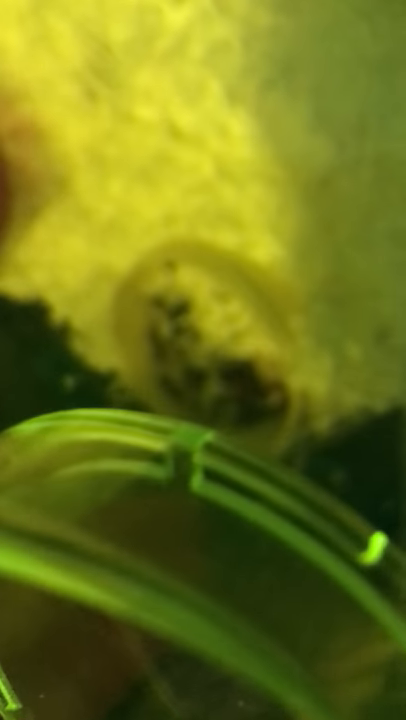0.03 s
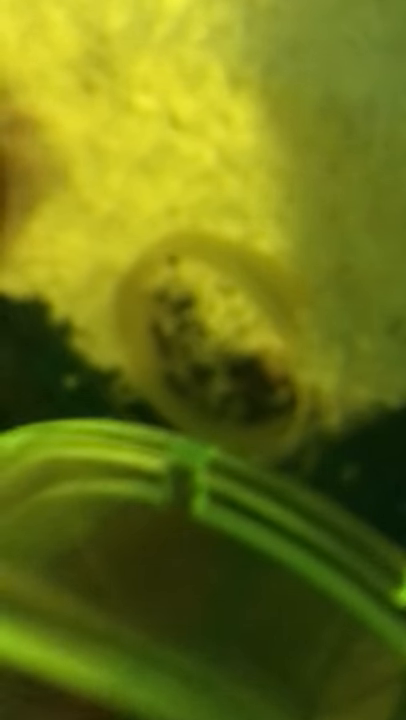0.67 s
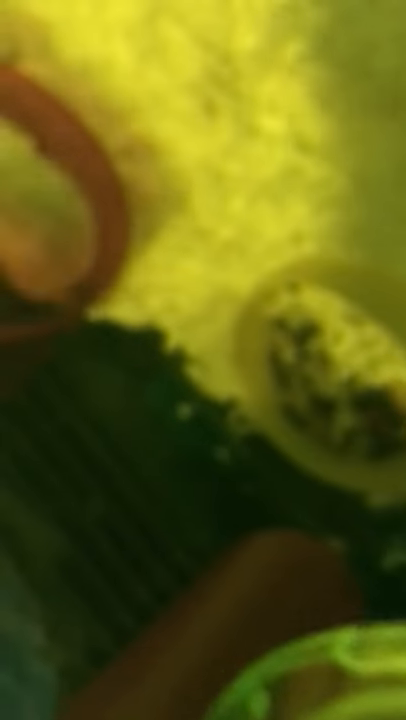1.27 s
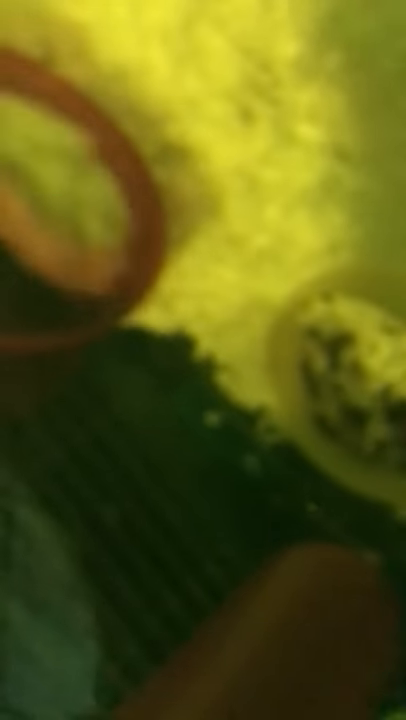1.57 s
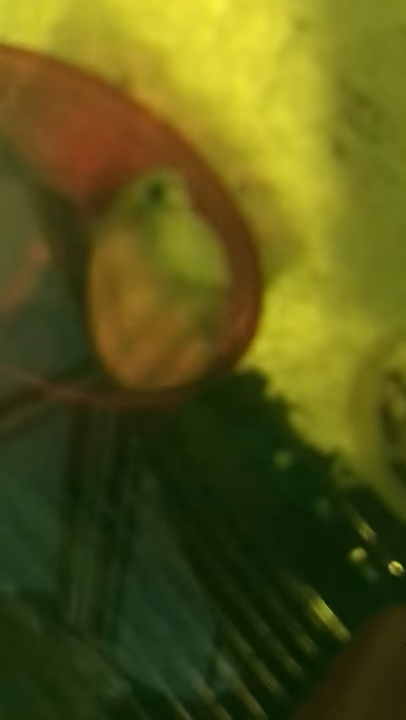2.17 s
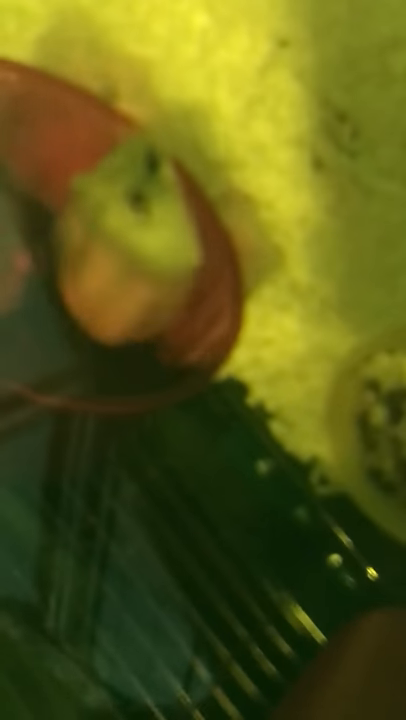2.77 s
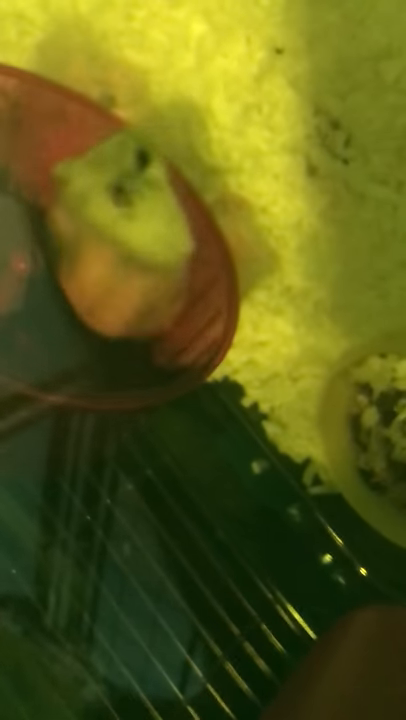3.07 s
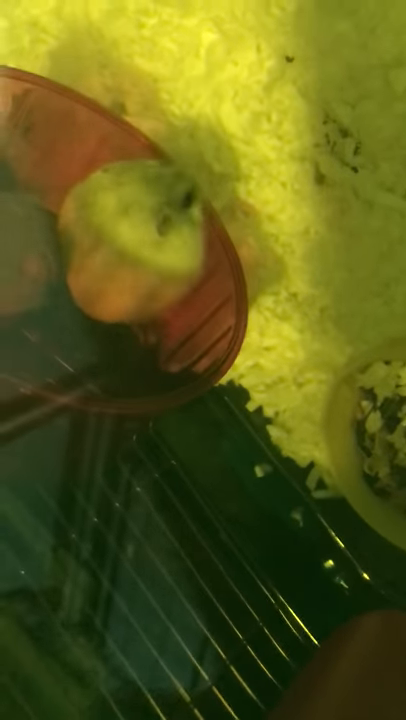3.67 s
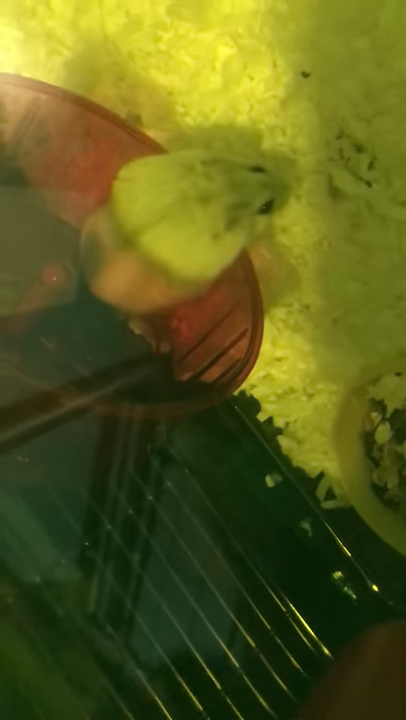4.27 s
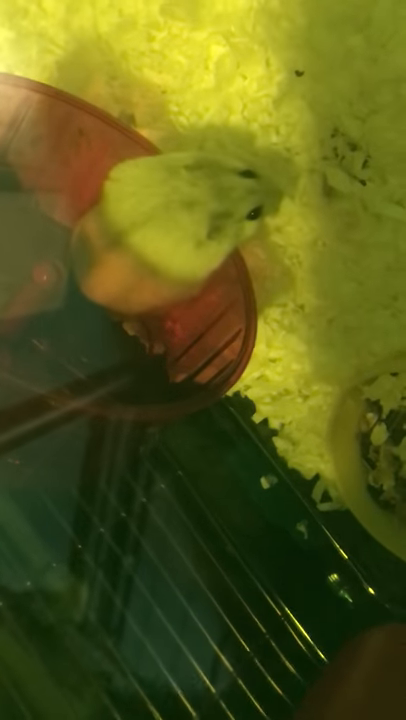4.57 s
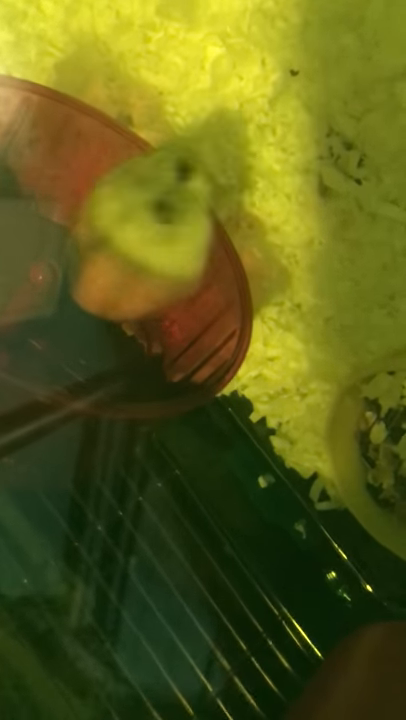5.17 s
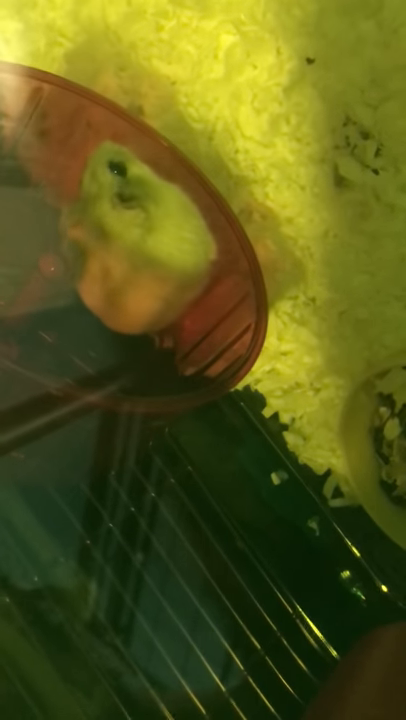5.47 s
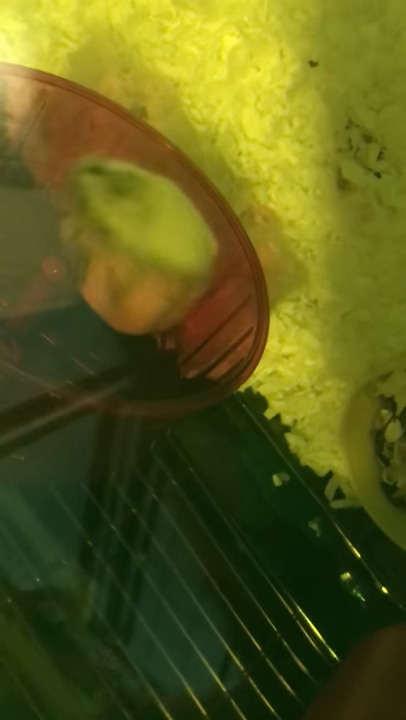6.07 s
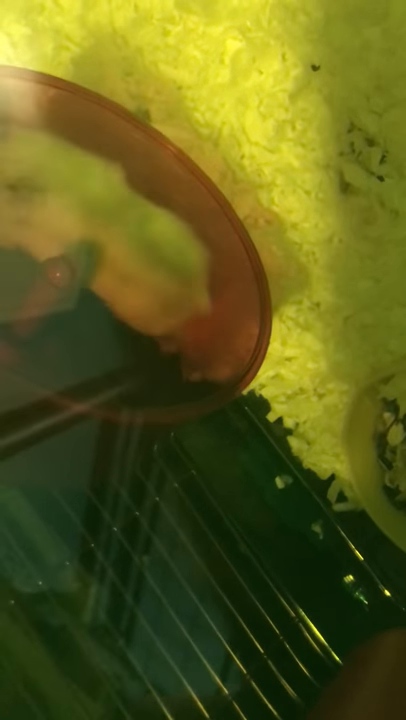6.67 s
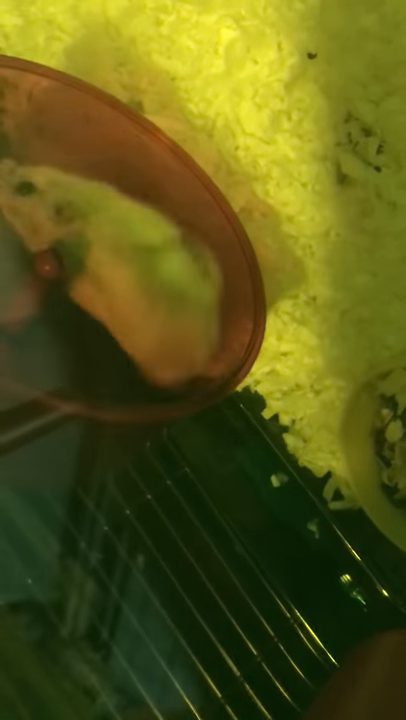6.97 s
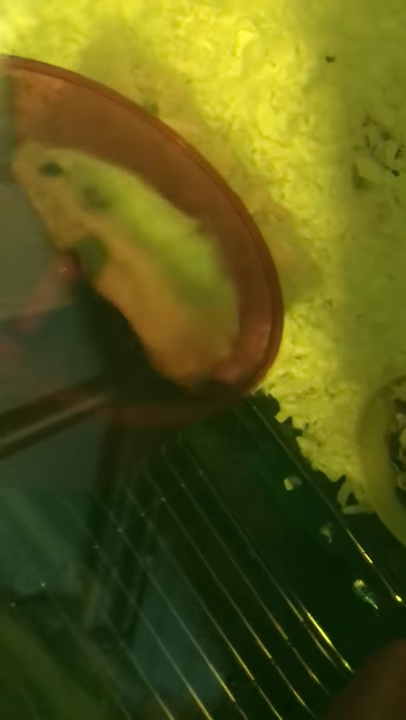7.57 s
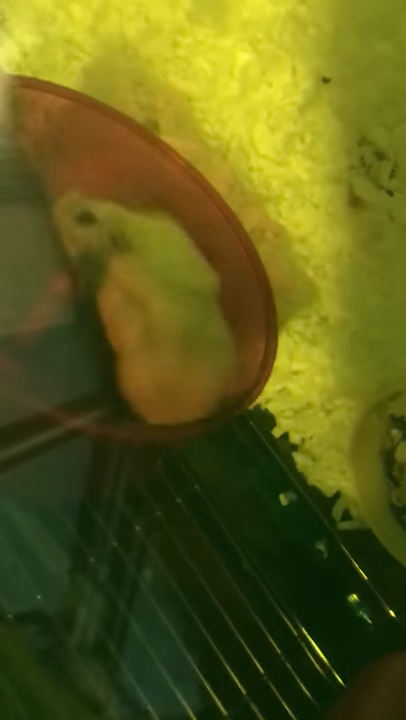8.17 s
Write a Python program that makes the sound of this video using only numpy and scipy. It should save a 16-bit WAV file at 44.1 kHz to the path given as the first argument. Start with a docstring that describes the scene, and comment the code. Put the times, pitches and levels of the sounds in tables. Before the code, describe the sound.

From the start, a hamster runs in a plastic wheel, heard close by in a quiet room. The wheel rumbles through its stand, the loose hub chatters and clacks irregularly, and quick claws scratch the ribbed track over a gritty rubbing of the rim. At about 1.8 seconds the wheel coasts to rest, while the shaken cage rings and rustles on faintly. From 2.4 to 6.2 seconds the animal shifts about with a few soft, dull thumps, faint paw slides and small plastic ticks, the clearest near 4.4 seconds. Firmer thumps around 6.5 seconds lead into a second run, heavier and duller, with fine claw ticks. Its rumbling and clacking surge at about 7.4 and 8 seconds and continue to the end, near 8.4 seconds. A low, steady room hiss lies underneath throughout.

```python
"""A plastic hamster wheel rumbles through its stand while its loose hub chatters and clacks on the axle.
Claws scratch the ribbed track and the rim rubs gritty as the animal runs in spurts. The wheel coasts
to rest, the hamster shifts about with soft thumps, ticks and paw slides, then it runs again.
The shaken cage rings and rustles on faintly over quiet room hiss."""
import sys
import numpy as np
from scipy import signal
from scipy.fft import rfft, irfft, next_fast_len
from scipy.io import wavfile
from scipy.ndimage import uniform_filter1d, map_coordinates

SR = 44100
rng = np.random.default_rng(int(sys.argv[2]) if len(sys.argv) > 2 else 0)


def output_pcm(signal):
    """Save a mono or channel-first signal as 16-bit PCM at the path in sys.argv[1].

    Samples are clipped to [-1, 1] before scaling.
    """
    pcm = np.clip(np.atleast_2d(signal).T, -1, 1) * 32767
    wavfile.write(sys.argv[1], SR, np.round(pcm).astype(np.int16))


N = 371763

# EQ of the room hiss: f/Hz, level/dB
ROOM_EQ = [(20, -4), (40, -8), (60, -2.5), (140, -5), (200, -11.5), (290, -17.5), (370, -20), (520, -16),
           (760, -20), (1200, -24), (1550, -27), (4100, -33.5), (4800, -36), (6000, -37), (10400, -42.5),
           (15600, -40.5)]
# EQ of the rustling axle and loose bars: f/Hz, level/dB
RUSTLE_EQ = [(400, -32), (600, -2), (900, -1), (1150, -3), (1380, -4), (1550, 1), (1900, -20), (2200, -36)]
# long ring of the cage bars: f/Hz, level/dB, t60/s
CAGE_MODES = [(446, -7, 5.7), (461, 4, 3.8), (482.6, 2.5, 6.2), (617, 0.5, 2.2), (624, -2, 2.3),
              (653, -5, 3.8), (679, -5.5, 2.6), (897, -13.5, 4.2), (1046, -14.5, 4.6), (1240, -5, 1.3),
              (1510, -17, 2), (1527, -9, 2), (1840, -10, 2)]
# paw slips on the resting wheel: t/s, length/s, level/dB, brightness/(dB per octave)
SLIDE_CUES = [(2.516, 0.06, -64, 4.5), (2.788, 0.17, -76, 6), (3.688, 0.034, -63, -9),
              (5.06, 0.24, -68, -2), (5.809, 0.28, -70.5, -1)]
# EQ of a sliding paw: f/Hz, level/dB
SLIDE_EQ = [(500, -7), (1000, 12), (2000, 10), (4000, 0), (7000, -5), (15000, -23)]
# ticks of the resting plastic: t/s, level/dB, relative edge/dB
TICK_CUES = [(3.695, -56, -8), (3.717, -49, -20), (4.374, -36.5, -11), (4.49, -47.5, -26),
             (4.501, -48.5, -26), (4.973, -49, -18), (5.411, -49, -8)]
# body of a tick: f/Hz, width/Hz, level/dB
TICK_MODES = [(520, 51, 0), (950, 180, -17), (1340, 240, 4), (1960, 170, -1), (3280, 150, -3),
              (4020, 260, -1), (9060, 500, -11)]
# weight shifts in the wheel: t/s, level/dB, cut-off/Hz
THUMP_CUES = [(2.44, -41.5, 250), (2.676, -39.5, 280), (4.594, -47, 170), (5.329, -40.5, 168),
              (6.256, -44.5, 220), (6.443, -32, 510), (6.576, -33.5, 448), (6.689, -34, 595)]
# footfalls: t/s, level/dB, relative claw tip/dB
FOOTFALL_CUES = [(0.026, -31.5, -9), (0.087, -38, -7), (0.145, -43, -4), (0.177, -25.5, -9.5),
                 (0.25, -40, -4), (0.273, -25, -16), (0.295, -30, -12), (0.332, -30, -16),
                 (0.353, -26.5, -11.5), (0.395, -23, -11.5), (0.429, -24.5, -16), (0.455, -35, -5.5),
                 (0.514, -40.5, -3), (0.562, -31, -8), (0.602, -29.5, -9), (0.664, -30, -13),
                 (0.776, -31, -10), (0.826, -28, -13), (0.891, -36.5, -5.5), (0.935, -24.5, -10),
                 (1.004, -40.5, -3), (1.048, -47, -3), (1.066, -48, -6), (1.101, -33.5, -15),
                 (1.12, -31, -12.5), (1.217, -36.5, -18), (1.277, -34, -18), (1.341, -37, -11),
                 (1.388, -28, -11), (1.453, -33.5, -10.5), (1.468, -37, -8), (1.494, -31.5, -17),
                 (1.544, -24.5, -17), (1.574, -32, -21), (1.594, -32, -18), (1.656, -31, -18),
                 (1.68, -37, -24), (1.705, -34, -21), (1.763, -34.5, -16), (1.829, -58, -4),
                 (1.856, -42.5, -20), (1.895, -38, -20), (2.005, -58, -6), (6.58, -50.5, -12.5),
                 (6.635, -50, -26), (6.728, -38.5, -20), (6.865, -46.5, -26), (6.926, -42.5, -21),
                 (6.984, -37, -19), (7.116, -39.5, -22), (7.179, -40.5, -24), (7.241, -35, -16),
                 (7.257, -46, -4), (7.283, -32, -19), (7.311, -34, -15.5), (7.359, -33.5, -11.5),
                 (7.418, -44, -5), (7.481, -55, -8), (7.538, -36, -16), (7.594, -44, -8), (7.652, -36, -14),
                 (7.672, -37, -23), (7.749, -40.5, -19), (7.795, -36, -19), (7.912, -35, -15),
                 (7.961, -35, -32), (7.989, -35.5, -9), (8.024, -31.5, -16), (8.044, -34.5, -10.5),
                 (8.082, -33, -12), (8.194, -40, -19), (8.256, -41.5, -22), (8.317, -43.5, -22),
                 (8.373, -32, -15.5)]
# the ribbed track: f/Hz, width/Hz, level/dB
TRACK_MODES = [(2395, 137, 10), (3080, 420, 5), (3630, 210, 7), (4270, 590, 1.5), (4710, 170, 1.5),
               (5326, 180, 3.5), (5965, 170, -1), (6454, 193, 0.5), (7400, 270, -6.5), (7950, 450, -5.5),
               (9100, 1070, -6.5), (10760, 370, -13), (12080, 830, -12), (13500, 600, -13.5),
               (15100, 800, -16)]
# the single rib under a claw: f/Hz, width/Hz, level/dB
RIB_MODES = [(3690, 45, 0), (5480, 130, -4)]
# rib ring against the footfall, freer in the second run: t/s, level/dB
RIB_SEND = [(1.8, -11), (6.5, -2.5)]
# claw tips sound finer in the second run: t/s, treble tilt/dB
CLAW_TILT = [(.5, 1), (7, 4.5)]
# the thin plastic drum: f/Hz, width/Hz, level/dB
DRUM_MODES = [(771, 60, -17.0), (850, 18, -6.5), (900, 50, -9.0), (968, 35, -4.0), (1008, 24, -1.0),
              (1060, 45, -7.0), (1131, 32, -1.5), (1183, 21, -3.0), (1249, 36, -0.5), (1339, 24, 0.0),
              (1403, 71, -7.0), (1558, 183, -11.0), (1711, 46, -5.5), (1806, 32, -3), (2004, 190, -13.0),
              (2275, 60, -11), (2529, 46, -16.0), (2613, 15, -6.0), (3033, 260, -21.0), (3441, 206, -21.0),
              (3783, 229, -22.0), (4021, 214, -23.0)]
# the crack at the front of a hub knock: f/Hz, width/Hz, level/dB
CRACK_MODES = [(1152, 67, 26.5), (1987, 214, 13.5), (2170, 330, -12)]
# hard knocks of hub on axle: t/s, level/dB, relative edge/dB
CLACK_CUES = [(0.109, -21, -37), (0.154, -16, -24), (0.219, -22.5, -20), (0.266, -21.5, -15.5),
              (0.327, -20, -17), (0.419, -14, -19), (0.441, -28, -10), (0.481, -17.5, -17),
              (0.537, -24.5, -10), (0.576, -14, -22), (0.6, -31, -31), (0.629, -12.5, -16.5),
              (0.637, -23.5, -8), (0.758, -23.5, -14), (0.815, -20.5, -25), (0.875, -25, -12.5),
              (1.015, -16, -25), (1.262, -24.5, -19.5), (1.316, -33.5, -6), (1.345, -19, -17),
              (1.426, -16.5, -36), (1.461, -11.5, -16), (1.47, -27, -22), (1.584, -20.5, -28),
              (1.648, -27, -28), (1.761, -22.5, -29), (1.888, -28, -38), (6.555, -30, -23.5),
              (6.564, -34, -24), (6.685, -30.5, -22), (6.834, -33.5, -24), (7.097, -47, -32),
              (7.277, -27.5, -10), (7.372, -20.5, -21), (7.422, -13.5, -19), (7.606, -15.5, -24.5),
              (7.661, -16, -17.5), (7.898, -26.5, -24), (7.929, -27, -22), (8.006, -21, -18.5),
              (8.054, -18.5, -20), (8.077, -16, -23), (8.167, -19.5, -23), (8.287, -24.5, -21),
              (8.36, -23.5, -29)]
# the animal's place in the drum colours the hub: t/s, treble tilt/dB
HUB_TILT = [(2, 0.14), (6.5, -2)]
# wheel and stand, weighted by the animal's place: f/Hz, width/Hz, run 1 level/dB, run 2 level/dB
STAND_MODES = [(55, 27, -14, -13), (72, 11, -5, -4), (87, 11, -9, -7), (112, 7, -10, -9), (129, 20, -7, -6),
               (146, 19, -6, -5), (172, 8, 0, 2), (193, 24, -6, -6), (228, 18, -6, -9), (262, 14, -7, -7),
               (284, 25, -10, -9), (329, 11, -6, -3), (351, 16, -13, -14), (383, 8, -2, -10),
               (448, 11, -6, -6), (482, 19, -14, -15), (571, 50, -18, -19), (613, 9, -9, -15),
               (652, 25, -19, -19)]
# drive on the wheel in each run, surging with every spurt: t/s, effort/dB
FIRST_RUN = [(0.0, -28), (0.098, -30), (0.168, -27), (0.198, -28.5), (0.652, -25.5), (0.712, -32),
             (0.872, -33.5), (0.916, -25.5), (1.012, -26.5), (1.196, -33), (1.484, -24.5), (1.51, -27),
             (1.654, -26.5), (1.789, -28)]
SECOND_RUN = [(6.565, -41), (6.6, -37.5), (6.63, -40.5), (6.672, -40.5), (6.702, -33), (6.77, -35),
              (6.815, -40.5), (6.85, -34.5), (6.97, -31.5), (7.06, -35), (7.342, -23), (7.506, -27),
              (7.662, -25), (7.882, -34), (8.022, -25), (8.356, -33.5), (8.398, -29.5), (8.43, -31)]
# faders at full effort, a row per run, the second heavier and duller: rumble/dB, chatter/dB, grit/dB
RUN_FADERS = [(-29.5, -32, -47), (-27, -36.5, -57)]

FULL_EFFORT_DB, START_DB_PER_S, COAST_DB_PER_S = -27, 599, 37.5
CHATTER_GROWS, GRIT_GROWS = 1.64, 1.5  # dB per dB of effort
UNLOAD_S, UNLOAD_DB = 0.029, 8.5  # chatter and grit duck once the paws let go
COAST_HINGE_HZ, COAST_DULL_DB = 240, 3.5  # high-shelf cut on the coasting rumble
KNOCKS_PER_S, KNOCK_DB, KNOCK_EDGE_DB, FAINTEST_DB = 6.3, 3, -17.5, -45  # light, chance hub knocks
CRACK_DB, CRACK_SCATTER_OCT = 1.5, 0.079  # the pitch differs with the spot that is hit
SPOT_DB = 1.8  # each claw lands elsewhere and weights the track's modes anew
GRIT_PER_S, CLUMP_DB, CLUMPS_PER_S = 2300, 4, 60
HARD_TICK_DB, THUMP_T60_S = -39.5, 0.37
CAGE_WAVER, CAGE_BEAT_DB, CAGE_BEATS_PER_S = 0.008, 3, 14  # waver is a share of the pitch
TOP_HZ = 15780


def amp(db):
    """Decibels to gain."""
    return 10 ** (np.asarray(db) / 20)


def unit(x):
    """Scale to rms 1."""
    return x / np.sqrt(np.mean(x ** 2) + 1e-20)


def normed(x):
    """Scale to energy 1."""
    return x / np.linalg.norm(x)


def peaked(x, db):
    """Scale a sound so that its envelope crests at db."""
    return x * amp(db) / np.sqrt(uniform_filter1d(x ** 2, size=128).max())


def levelled(x, size):
    """Even out the slow swings of a rattle over a window of size samples."""
    return x / np.sqrt(np.abs(uniform_filter1d(x ** 2, size=size)) + 1e-12)


def add(track, s, sound):
    """Mix a sound in at time s."""
    start = max(round(s * SR), 0)
    track[start:start + len(sound)] += sound[:max(N - start, 0)]


def filtered(x, response):
    """x through a frequency response."""
    size = next_fast_len(len(x) + 8192)
    return irfft(rfft(x, size) * response(np.fft.rfftfreq(size, 1 / SR)), size)[:len(x)]


def eq(x, points):
    """x through an EQ curve on a log axis: f/Hz, level/dB."""
    f, db = np.transpose(points)
    return filtered(x, lambda hz: amp(np.interp(np.log(hz + 1), np.log(f), db, left=-120)))


def resonate(x, modes):
    """x through a body's resonances, alternating in polarity: f/Hz, width/Hz, level/dB."""
    return filtered(x, lambda f: sum(
        (-1) ** k * amp(db) * 1j * f * width / (hz * hz - f * f + 1j * f * width)
        for k, (hz, width, db) in enumerate(modes)))


def band(x, edge_hz, kind, order=2):
    """Causal high-pass or low-pass."""
    return signal.sosfilt(signal.butter(order, edge_hz, kind, fs=SR, output="sos"), x)


def lows(x, hinge_hz):
    """The low side of a zero-phase crossover."""
    return filtered(x, lambda hz: 1 / (1 + (hz / hinge_hz) ** 8))


def tilted(x, hinge_hz, curve):
    """Automated tilt EQ: the curve's dB are added above the hinge and taken away below."""
    low = lows(x, hinge_hz)
    tilt_db = np.interp(np.arange(N) / SR, *np.transpose(curve))
    return amp(-tilt_db) * low + amp(tilt_db) * (x - low)


def enclosed(x, t60, wet_db):
    """x with the short, dense reflections of drum and cage."""
    t = np.arange(SR // 4) / SR
    tail = rng.standard_normal(len(t)) * amp(-60 * t / t60)
    return x + amp(wet_db) * signal.fftconvolve(x, normed(tail))[:len(x)]


def wobble(rate):
    """A smooth random curve, rate knots a second."""
    return map_coordinates(rng.standard_normal(int(N * rate / SR) + 4), [np.arange(N) * rate / SR])


def impacts(per_second, spread_db, size=N):
    """Randomly timed contacts of scattered strength."""
    hits = (rng.random(size) < per_second / SR) * rng.choice([-1, 1], size)
    return hits * amp(spread_db * rng.standard_normal(size).clip(-2, 2))


def contact(bounces_per_s, bounce_share, t60):
    """One blow of energy 1: a first touch, then a dying run of bounces."""
    t = np.arange(SR // 10) / SR
    bounces = impacts(bounces_per_s, spread_db=6.5, size=len(t)) * amp(-60 * t / t60)
    blow = bounce_share * normed(bounces)
    blow[0] = 1
    return normed(blow)


def struck(blows, ring):
    """An ongoing train of blows through a body's ringing."""
    return signal.oaconvolve(np.pad(blows, (len(ring), 0), "wrap"), normed(ring))[len(ring):][:N]


def lingering(gain, t60):
    """Envelope of something that stores the wheel's energy and lets it die away over t60."""
    keep = amp(-120 / (t60 * SR))
    return np.sqrt(signal.lfilter([1 - keep], [1, -keep], gain ** 2))


def room():
    """The bed: steady hiss, a weak mains hum and a thin electronic whine."""
    t = np.arange(N) / SR
    hiss = unit(eq(rng.standard_normal(N), ROOM_EQ))
    hum = np.sin(2 * np.pi * 59.5 * t)
    whine = sum(np.sin(2 * np.pi * 1002.2 * k * t) * min(1, 4 / k) for k in range(2, 15))
    return amp(-58) * hiss + amp(-60.5) * hum + amp(-83.5) * whine


def rustle(gain):
    """A soft rustle of the axle and loose bars hangs on after the wheel slows."""
    noise = band(eq(rng.standard_normal(N), RUSTLE_EQ), 2350, "low", order=4)
    return amp(-30.5) * lingering(gain, t60=5.5) * unit(noise)


def cage(gain):
    """Lightly damped bars store the wheel's shaking and ring on as wavering, beating tones."""
    out = np.zeros(N)
    for hz, db, t60 in CAGE_MODES:
        pitch = hz * (1 + CAGE_WAVER * wobble(20))
        tone = np.sin(2 * np.pi * np.cumsum(pitch) / SR)
        beating = unit(amp(CAGE_BEAT_DB * wobble(CAGE_BEATS_PER_S)))
        out += amp(db - 23) * lingering(gain, t60) * beating * tone
    return out


def slides():
    """A paw slips on the track: a short swell of tiny catches."""
    out = np.zeros(N)
    for s, length_s, db, bright in SLIDE_CUES:
        size = int(length_s * SR)
        colour = [(hz, level + bright * np.log2(hz)) for hz, level in SLIDE_EQ]
        grit = eq(impacts(4000, spread_db=2, size=size), colour)
        add(out, s, amp(db) * unit(grit) * signal.windows.tukey(size, 0.5))
    return out


def ticks():
    """The plastic ticks as the load on the resting wheel changes; harder ticks knock and snap more."""
    out = np.zeros(N)
    groups = TICK_MODES[:1], TICK_MODES[1:4], TICK_MODES[4:6], TICK_MODES[6:]
    for s, db, edge_db in TICK_CUES:
        tap = enclosed(signal.unit_impulse(SR // 8), t60=0.094, wet_db=-11)
        knock, middle, edge, snap = (unit(resonate(tap, modes)) for modes in groups)
        force_db = db - HARD_TICK_DB
        body = amp(force_db + 4.5) * knock + amp(-1.5) * middle
        top = amp(edge_db + 10.5) * edge + amp(2 * force_db - 6) * snap
        add(out, s, peaked(body + top, db - 5.5))
    return out


def stand_modes(run):
    """The stand's modes as the first (0) or second (1) run drives them."""
    return [(hz, width, levels[run]) for hz, width, *levels in STAND_MODES]


def thumps():
    """The furry body's weight drops on the stand with no sharp edge; softer landings are duller."""
    out, t = np.zeros(N), np.arange(SR // 3) / SR
    tap = signal.unit_impulse(len(t))
    ring = band(sum(resonate(tap, [mode]) for mode in stand_modes(1)), 95, "high", order=3)
    for s, db, cutoff_hz in THUMP_CUES:
        push = rng.standard_normal(len(t)) * amp(-60 * t / THUMP_T60_S)
        muffled = band(ring, cutoff_hz, "low", order=5)
        add(out, s, peaked(signal.fftconvolve(push, muffled)[:len(t)], db - 5))
    return out


def rim_scrape(gain):
    """The rim rubs its stand in gritty clumps that keep the track sounding between footfalls."""
    catches = impacts(GRIT_PER_S, spread_db=4) * amp(CLUMP_DB * wobble(CLUMPS_PER_S))
    grit = enclosed(resonate(catches, TRACK_MODES), t60=0.053, wet_db=7.5)
    return gain * unit(band(band(grit, 1900, "high"), 9900, "low", order=1))


def claws():
    """Each claw ticks and skids on the track and rings a rib; its sharp tip adds the top end."""
    body, tips = np.zeros((2, N))
    for s, db, tip_db in FOOTFALL_CUES:
        skid = contact(bounces_per_s=4500, bounce_share=2.8, t60=0.055)
        modes = [(hz, width, level + SPOT_DB * rng.standard_normal()) for hz, width, level in TRACK_MODES]
        track = resonate(skid, modes)
        scratch = normed(band(band(track, 2460, "high"), 6700, "low", order=4))
        rib = amp(np.interp(s, *np.transpose(RIB_SEND))) * normed(resonate(skid, RIB_MODES))
        add(body, s, amp(db + 13) * (scratch + rib))
        add(tips, s, amp(db + tip_db + 22) * normed(band(track, 5220, "high", order=4)))
    tips = tilted(tips, hinge_hz=10400, curve=CLAW_TILT)
    return enclosed(body, t60=0.13, wet_db=2) + enclosed(tips, t60=0.17, wet_db=4)


def chatter(gain):
    """The loose hub rattles lightly on the axle and shakes the drum."""
    ring = resonate(signal.unit_impulse(SR // 6, idx=256), DRUM_MODES)
    ring = eq(ring, [(450, -47), (750, 4.5), (1250, -0.5), (1900, 0.5),
                     (2600, -4), (3100, -27), (4200, 4), (7000, 19)])
    ring = band(ring, 4000, "low", order=5)
    rattle = unit(struck(impacts(1400, spread_db=1), ring))
    return amp(0.5) * gain * levelled(rattle, size=2400)


def clacks(gain):
    """The hub knocks and bounces, ringing the drum: hard hits on cue, lighter ones by chance."""
    tap = signal.unit_impulse(SR // 6)
    drum = normed(sum(resonate(tap, [mode]) for mode in DRUM_MODES))
    times = np.cumsum(rng.exponential(1 / KNOCKS_PER_S, size=200))
    light = []
    for s in times[times < N / SR]:
        db = KNOCK_DB + 20 * np.log10(gain[int(s * SR)] + 1e-9)
        if db > FAINTEST_DB:  # weaker knocks are lost in the chatter
            light.append((s, db, KNOCK_EDGE_DB))
    out = np.zeros(N)
    for s, db, edge_db in CLACK_CUES + light:
        pitch = 2 ** (CRACK_SCATTER_OCT * rng.standard_normal())
        crack = normed(resonate(tap, [(hz * pitch, width, level) for hz, width, level in CRACK_MODES]))
        ring = enclosed(drum + amp(CRACK_DB) * crack, t60=0.13, wet_db=2.5)
        body = band(band(ring, 610, "high"), 1855, "low", order=4)
        edge = band(band(ring, 2000, "high", order=4), 2800, "low", order=4)
        blow = contact(bounces_per_s=2000, bounce_share=1, t60=0.06)
        add(out, s, peaked(signal.fftconvolve(blow, body), db - 7.5))
        add(out, s, peaked(signal.fftconvolve(blow, edge), db + edge_db + 8))
    return out


def hub(gain):
    """Chatter and clacks of the hub, coloured by where the animal loads the drum."""
    return tilted(chatter(gain) + clacks(gain), hinge_hz=1160, curve=HUB_TILT)


def effort(curve):
    """One run from quick start to coast-down: dB against full effort, and the paws' release (0-1)."""
    t = np.arange(N) / SR
    s, db = np.transpose(curve)
    before, after = np.maximum(s[0] - t, 0), np.maximum(t - s[-1], 0)
    push_db = np.interp(t, s, db) - FULL_EFFORT_DB - START_DB_PER_S * before - COAST_DB_PER_S * after
    return push_db, np.minimum(after / UNLOAD_S, 1)


def wheel_gains():
    """Fader rides for rumble, chatter and grit: all follow the effort, the last two more steeply."""
    gains = np.zeros((3, N))
    for curve, (rumble_db, chatter_db, grit_db) in zip((FIRST_RUN, SECOND_RUN), RUN_FADERS):
        push_db, release = effort(curve)
        gains += amp([rumble_db + push_db,
                      chatter_db + CHATTER_GROWS * push_db - UNLOAD_DB * release,
                      grit_db + GRIT_GROWS * push_db - UNLOAD_DB * release])
    return gains


def wheel_rumble(gain):
    """Bumps of the rolling, loaded wheel shake the stand; the rumble dulls once the wheel coasts."""
    out = np.zeros(N)
    second = np.arange(N) / SR > (FIRST_RUN[-1][0] + SECOND_RUN[0][0]) / 2
    for run, (curve, active) in enumerate(((FIRST_RUN, ~second), (SECOND_RUN, second))):
        ring = band(resonate(signal.unit_impulse(SR // 2), stand_modes(run)), 35, "high", order=6)
        ring = eq(np.pad(ring, (512, 0)),
                  [(30, -9), (80, 3), (170, 1.5), (330, 0.5), (700, 1), (1400, -2)])
        shake = levelled(unit(struck(impacts(900, spread_db=2.5), ring)), size=3000)
        low = lows(shake, COAST_HINGE_HZ)
        _, release = effort(curve)
        out += active * (low + amp(-COAST_DULL_DB * release) * (shake - low))
    return amp(-0.5) * gain * out


def scene():
    """Mono mix of wheel, animal and cage, close by in a quiet room."""
    roll, rattle, grit = wheel_gains()
    wheel = wheel_rumble(roll) + thumps() + hub(rattle) + rim_scrape(grit) + ticks() + slides()
    background = cage(roll) + rustle(roll) + room()
    return (wheel + background + claws())[None]


def record(dry):
    """A brick-wall low-pass on the master."""
    return np.array([filtered(channel, lambda hz: hz < TOP_HZ) for channel in dry])


dry = scene()
out = record(dry)
output_pcm(out)
```